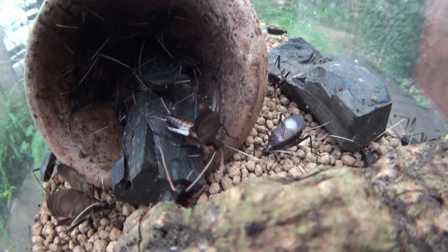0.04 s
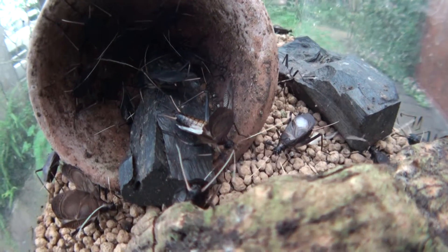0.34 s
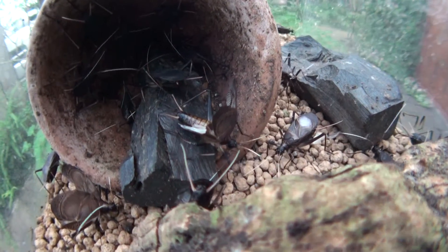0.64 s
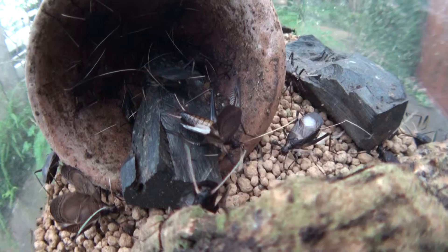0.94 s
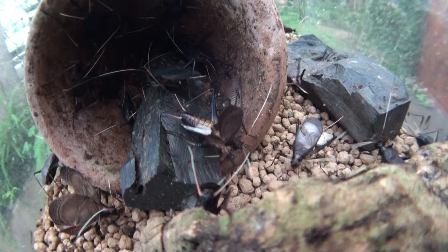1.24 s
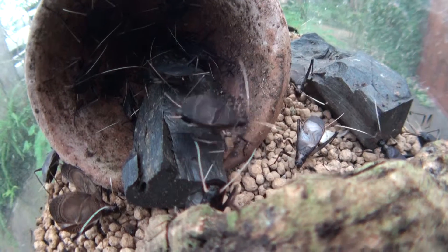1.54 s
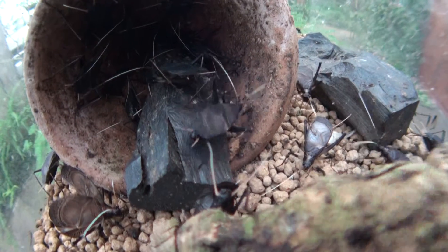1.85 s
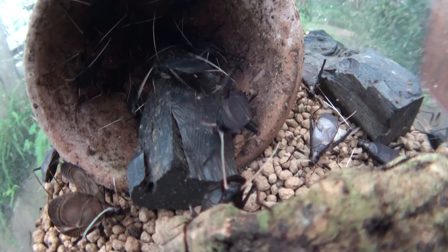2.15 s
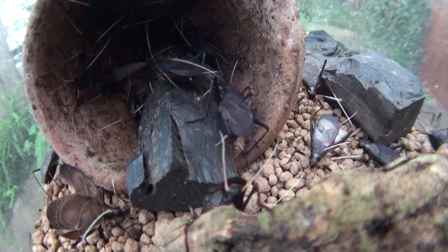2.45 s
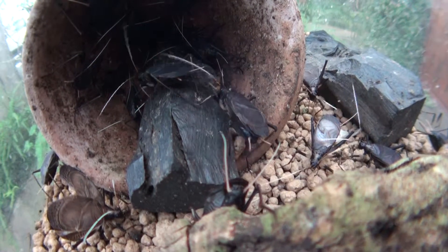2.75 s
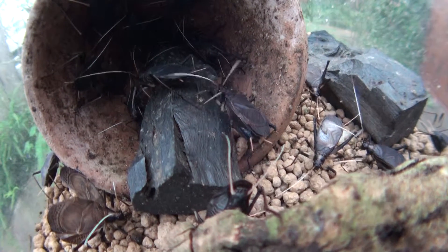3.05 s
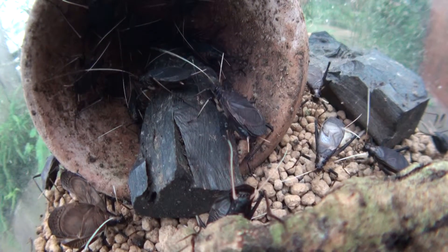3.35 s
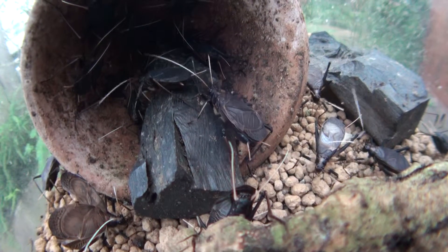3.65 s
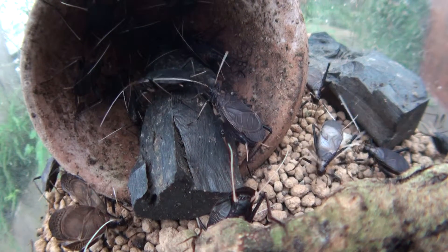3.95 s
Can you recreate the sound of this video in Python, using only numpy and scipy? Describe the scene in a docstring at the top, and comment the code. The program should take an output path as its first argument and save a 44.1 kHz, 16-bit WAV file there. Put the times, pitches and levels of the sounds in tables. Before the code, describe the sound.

A cricket trills loudly up close, then stops, leaving faint high bird chirps.

```python
"""Cricket at a clay pot

A cricket trills close up at the mouth of a clay pot in a terrarium, then stops. Each wing stroke drags
a scraper over a file: one ringing syllable when pressed hard, two short ones when light.
A soft bump and a brushing sound follow, with faint high bird chirps over quiet room tone."""
import sys
import numpy as np
from scipy import signal
from scipy.fft import rfft, irfft
from scipy.io import wavfile
from scipy.ndimage import uniform_filter1d

SR = 44100
rng = np.random.default_rng(int(sys.argv[2]) if len(sys.argv) > 2 else 0)


def dump_mix(stems):
    """Bounce the given channels to the path in sys.argv[1] as a 16-bit WAV at rate SR."""
    frames = np.atleast_2d(stems).T  # one column per channel
    limited = np.clip(frames, -1, 1)  # hard clip at full scale
    pcm = np.round(limited * 32767).astype(np.int16)
    wavfile.write(sys.argv[1], SR, pcm)


N = 176400
T = np.arange(N) / SR
FREQS = np.maximum(np.fft.rfftfreq(N, 1 / SR), 1)
SIDE = np.array([[1], [-1]])  # left plus, right minus

# room tone colour (frequency [Hz], relative level [dB])
ROOM_COLOUR = [(15, -39), (25, -2.5), (79, -2), (169, -1), (227, -1), (469, -8), (804, -4.5), (1170, -9.5),
               (1270, -10.5), (1380, -12), (2300, -16.5), (2770, -19), (5730, -24.5), (6210, -26),
               (6730, -19), (7300, -25.5), (8810, -27), (11800, -30.5), (15500, -26)]
# room tone fader (time [s], level [dB])
ROOM_LEVEL = [(0, -62), (.8, -59.5), (1.3, -59.5), (1.8, -58), (2.1, -59), (2.8, -59), (3.25, -59),
              (3.7, -60), (3.85, -59), (4, -59)]
# room tone stereo width (frequency [Hz], side minus mid [dB])
ROOM_WIDTH = [(40, -29.5), (150, -21.5), (350, -7.5), (700, -6), (1500, -1), (5000, -0.5), (10000, -1),
              (13000, -20)]
# faint whistling bands in the hiss (centre [Hz], width [Hz], level [dB])
WHISTLE_BANDS = [(10080, 400, -84.5), (12100, 1500, -78.5)]
# small rustles (time [s], half-width [s], centre [Hz], bandwidth [Hz], level [dB])
RUSTLE_CUES = [(2.72, .018, 13300, 4000, -68), (3.247, .008, 3000, 6000, -69.5),
               (3.855, 0.024, 1790, 2510, -68), (3.972, 0.016, 2500, 5000, -66.5)]
# distant thin calls (time [s], level [dB])
FAR_CALLS = [(1.97, -76), (2.18, -76), (2.71, -77), (2.92, -77), (3.06, -83), (3.16, -79), (3.84, -78.5)]
# bird chirps (time [s], pitch [Hz], level [dB])
BIRD_CHIRPS = [(1.881, 6690, -73), (1.92, 6570, -63.5), (1.94, 6630, -61), (2.172, 6700, -68),
               (2.21, 6640, -63), (2.254, 6690, -60), (2.466, 6680, -65.5), (2.5, 6650, -63.5),
               (2.57, 6700, -61), (2.76, 6630, -65.5), (2.797, 6600, -62), (2.817, 6950, -67),
               (2.886, 6670, -62.5), (3.083, 6900, -65.5), (3.1, 6660, -63.5), (3.208, 6700, -64),
               (3.36, 6970, -65.5), (3.37, 6640, -65.5), (3.404, 6620, -66), (3.54, 6580, -64),
               (3.64, 6940, -63.5), (3.706, 6690, -66), (3.8, 6580, -69.5), (3.93, 6820, -67.5)]
# brushing fader (time [s], level [dB])
BRUSH_LEVEL = [(2.26, -82), (2.34, -58), (2.41, -58), (2.47, -62.5), (2.58, -66.5), (2.7, -83)]
# brushing colour (frequency [Hz], relative level [dB])
BRUSH_EQ = [(300, -18), (700, -1), (1000, 7.5), (1400, -9), (2200, -9), (3600, -17), (8000, -32)]
# contacts within the bump (time [s], level [dB])
BUMP_HITS = [(1.912, -50), (1.921, -47.5), (1.93, -48), (1.9337, -46.5)]
# bump colour (frequency [Hz], relative level [dB])
BUMP_EQ = [(60, -6), (120, -9), (260, 5), (580, 3), (800, -6), (1500, -20), (4000, -22.5), (9000, -35)]
# low thuds (time [s], pitch [Hz], level [dB])
THUD_HITS = [(0.397, 156, -54.5), (1.029, 111, -58.5), (1.937, 92, -50)]
# wing beat (time [s], rate [strokes/s])
WING_BEAT = [(0.0, 46.91), (0.13, 47.86), (0.23, 54.01), (0.5, 54.6), (0.79, 54.23), (0.87, 49.89),
             (1.02, 43.67), (1.19, 52.08), (1.4, 53.93), (1.55, 55.06), (1.63, 52.91), (1.79, 51.21)]
# trill dynamics (time [s], level [dB])
TRILL_LEVEL = [(0, -22), (.14, -22.5), (.22, -22), (.3, -20), (.38, -19.5), (.45, -21), (.57, -21.5),
               (.66, -23.5), (.8, -23.5), (.9, -23.5), (.97, -18.5), (1.06, -18.5), (1.09, -19),
               (1.13, -13.5), (1.21, -11.5), (1.32, -14), (1.4, -18), (1.5, -19.5), (1.79, -20.5)]
# wing pressure (time [s], pressure [0 = two short syllables, 1 = one long one])
WING_PRESSURE = [(.13, 0.24), (.16, 0.76), (.23, 1), (.36, 0.94), (.42, 0.92), (.46, 0.21), (.56, 0.48),
                 (.59, 0.19), (.9, 0), (.94, 0.08), (1.03, 0.25), (1.06, .1), (1.11, 0.78), (1.33, 0.85),
                 (1.47, .7), (1.5, 0.39)]
# shape of a light stroke (phase [0-1], amplitude [0-1], tooth rate [Hz])
LIGHT_STROKE = [(0, 0, 5100), (.045, .72, 4930), (.12, 1, 4835), (.24, .55, 4740), (.35, 0, 4640),
                (.47, 0, 5080), (.53, .75, 4930), (.59, .92, 4835), (.66, .55, 4750), (.73, 0, 4660)]
# shape of a pressed stroke (phase [0-1], amplitude [0-1], tooth rate [Hz])
PRESSED_STROKE = [(0, 0, 5000), (.07, .72, 4890), (.17, 1, 4820), (.32, .72, 4780), (.46, .85, 4905),
                  (.57, .92, 4890), (.69, .66, 4790), (.79, 0, 4720)]
# spells when the scraper misses the first half of the stroke (start [s], end [s])
EARLY_MISSES = [(.811, .85)]
# spells when it misses the second half (start [s], end [s])
LATE_MISSES = [(.572, .646), (.682, .72), (.757, .776), (1.506, 1.578), (1.598, 1.673), (1.711, 1.729)]
# tooth rate drift, sharpest near the top of the swell (time [s], offset [Hz])
TOOTH_DRIFT = [(0, 11), (.3, 6.5), (1.0, 2.5), (1.14, 32.5), (1.18, 76.5), (1.22, 30), (1.3, 4),
               (1.4, -19.5), (1.55, 7)]
# wing resonances rung by the rasp (centre [Hz], width [Hz], relative level [dB])
WING_MODES = [(4600, 300, -26), (5390, 490, -31.5), (6343, 440, -39), (8935, 800, -39.5), (9965, 530, -38),
              (12320, 739, -39.5), (13150, 1000, -43.5), (14280, 250, -47.5), (15050, 560, -47)]


def amp(db):
    """Decibels to gain."""
    return 10 ** (np.asarray(db) / 20)


def curve(rows, at=T, column=1):
    """Straight lines through a column of a table."""
    rows = np.array(rows, float)
    return np.interp(at, rows[:, 0], rows[:, column])


def colour(rows):
    """EQ curve through (frequency [Hz], level [dB]) points."""
    rows = np.array(rows, float)
    return amp(np.interp(np.log(FREQS), np.log(rows[:, 0]), rows[:, 1]))


def resonance(hz, width_hz):
    """Steep-sided response of a resonance."""
    return 1 / (1 + 1j * (FREQS / hz - hz / FREQS) * hz / width_hz / np.sqrt(2)) ** 2


def through(x, gain):
    """Filter a sound by a frequency response."""
    return irfft(rfft(x) * gain, N)


def noise(gain):
    """Noise of rms 1 with the given spectrum."""
    x = through(rng.standard_normal(N), gain)
    return x / x.std()


def wobble(hz):
    """Random wavering up to a given rate."""
    return noise(1 / (1 + (FREQS / hz) ** 4))


def swell(at, half_width_s):
    """A bell-shaped rise and fall around a moment."""
    return np.exp(-.5 * ((T - at) / half_width_s) ** 2)


def within(spans):
    """A gate, open during the listed spells."""
    return np.any([(T > a) & (T < b) for a, b in spans], axis=0)


def echoes(x, t60_s):
    """Dense reflections that die away."""
    t = T[:SR // 2]
    tail = rng.standard_normal(len(t)) * np.exp(-np.log(1000) * t / t60_s) * (t > .001)
    return signal.fftconvolve(x, tail / np.linalg.norm(tail))[:N]


def room_tone():
    """A quiet bed of air, wider in the treble, with a thin hiss and a low drone."""
    mid = noise(colour(ROOM_COLOUR))
    side = through(noise(colour(ROOM_COLOUR)), colour(ROOM_WIDTH))
    hiss = sum(amp(db) * noise(resonance(hz, width)) for hz, width, db in WHISTLE_BANDS)
    drone = amp(-71) * noise(resonance(hz=218, width_hz=25))
    return amp(curve(ROOM_LEVEL)) * (mid + side * SIDE) + hiss + drone


def rustles():
    """Brief, faint puffs of band noise."""
    return sum(amp(db) * swell(at, half_width) * noise(resonance(hz, band))
               for at, half_width, hz, band, db in RUSTLE_CUES)


def birds(fall_hz_per_s=7500):
    """Thin falling chirps with a short reverb, and fainter, lower calls from far off."""
    chirps = 0
    for at, hz, db in BIRD_CHIRPS:
        t = T - at
        sweep = np.sin(2 * np.pi * (hz - fall_hz_per_s * t / 2) * t)
        chirps += amp(db) * swell(at, half_width_s=.0095) * sweep
    call_level = sum(amp(db) * swell(at, half_width_s=.04) for at, db in FAR_CALLS)
    calls = call_level * noise(resonance(hz=5090, width_hz=220))
    reverb = amp(-11) * np.array([echoes(chirps, t60_s=.24) for _ in range(2)])
    return chirps + calls + reverb


def brush(stereo_width=.38):
    """A soft brushing sound that swells and fades."""
    level = amp(curve(BRUSH_LEVEL)) * within([(BRUSH_LEVEL[0][0], BRUSH_LEVEL[-1][0])])
    mid, side = (noise(colour(BRUSH_EQ)) for _ in range(2))
    return level * (mid + stereo_width * side * SIDE)


def bumps(hit_decay_s=.0063, thud_decay_s=.025):
    """A cluster of dull contacts; low thuds land there and twice under the trill."""
    hits = sum(amp(db) * (T > at) * np.exp(-np.abs(T - at) / hit_decay_s) for at, db in BUMP_HITS)
    out = hits * noise(colour(BUMP_EQ))
    for at, hz, db in THUD_HITS:
        t = np.maximum(T - at, 0)
        out += amp(db) * np.exp(-t / thud_decay_s) * np.sin(2 * np.pi * hz * t)
    return out


def pot_and_room(song):
    """Tight reflections inside the clay pot and a faint tail from the room."""
    pot_mid = amp(-23) * echoes(song, t60_s=.07)
    pot_side = amp(-22) * echoes(song, t60_s=.035)
    room = amp(-43) * np.array([echoes(song, t60_s=.16) for _ in range(2)])
    return pot_mid + pot_side * SIDE + room


def file_rasp(scrape):
    """The rasp of the file rings the wing's resonances, each as a band of noise."""
    rasp = 0
    for hz, width, db in WING_MODES:
        band = through(scrape * rng.standard_normal(N), resonance(hz, width))
        rasp += amp(db) * np.sqrt(SR / 2 / width) * band
    return rasp


def wing_ring(tone, swing, pressure):
    """An upper wing mode follows the tone and rings on as the scraper lets go."""
    fall_rate = np.maximum(-np.gradient(swing) * SR, 0)
    release = fall_rate * (1 - pressure) * rng.standard_normal(N)
    return through(amp(-.5) * tone + amp(-53.5) * release, resonance(hz=5555, width_hz=300))


def wing_tone(swing, tooth_hz, stroke, pressure, level_db):
    """File teeth drive the wing near its resonance: a fluttering tone with two overtones."""
    jitter_hz, main_hz, light_glide = 24, 4830, .64
    pitch_hz = tooth_hz + curve(TOOTH_DRIFT) + jitter_hz * wobble(hz=630)
    teeth = 2 * np.pi * (np.cumsum(pitch_hz) / SR + rng.random(N)[stroke])  # fresh phase each stroke
    # light strokes glide further in the second harmonic
    glide = 2 * np.pi * np.cumsum(light_glide * (1 - pressure) * (tooth_hz - main_hz)) / SR
    second = amp(-17) * np.sin(2 * (teeth + glide))
    third = amp(-46 + .7 * (level_db + 21)) * np.sin(3 * teeth)  # brighter when louder
    flutter = 1 + .04 * wobble(hz=300)
    return swing * flutter * (np.sin(teeth) + second + third)


def cricket():
    """Stroke by stroke, the scraper crosses the file and sets the wing singing and rasping."""
    start_phase, half_stroke = .03, .42
    scatter_db, light_scatter_db = .5, .8
    rasp_db, light_rasp_db, grain_db, rasp_growth = -11.5, 3.5, 3.5, .43
    turn_floor, slide_share = .05, .31

    beats = np.cumsum(curve(WING_BEAT)) / SR + start_phase
    stroke, phase = beats.astype(int), beats % 1
    late = phase > half_stroke
    pressure = curve(WING_PRESSURE)
    contact, tooth_hz = ((1 - pressure) * curve(LIGHT_STROKE, phase, column)
                         + pressure * curve(PRESSED_STROKE, phase, column) for column in (1, 2))
    catches = ~np.where(late, within(LATE_MISSES), within(EARLY_MISSES))

    # each half stroke has its own strength; light ones vary more
    accent = rng.standard_normal(N)[2 * stroke + late]
    level_db = curve(TRILL_LEVEL) + accent * (scatter_db + light_scatter_db * (1 - pressure))
    force = amp(level_db) * (T < WING_BEAT[-1][0])
    swing = uniform_filter1d(force * contact * catches, size=30)
    tone = wing_tone(swing, tooth_hz, stroke, pressure, level_db)
    ring = wing_ring(tone, swing, pressure)

    # the scraper still slides and hisses where it turns or misses the second half
    scrape = (force * np.maximum(contact, turn_floor)) ** rasp_growth
    scrape *= np.where(catches, 1, slide_share * late)
    scrape *= amp(rasp_db + light_rasp_db * (.5 - pressure) + grain_db * wobble(hz=500.4))
    rasp = file_rasp(scrape)
    dull_scuff = amp(-48.5) * scrape * noise(resonance(hz=3500, width_hz=1500))

    # the wing radiates little below its main resonance
    low_cut = signal.butter(12, 4406, "high", fs=SR, output="sos")
    return signal.sosfilt(low_cut, tone + ring + rasp) + dull_scuff


def scene(balance_db=.6):
    """The cricket and its reflections over the background, all panned a touch left."""
    song = cricket()
    mix = song + pot_and_room(song) + birds() + bumps() + brush() + rustles() + room_tone()
    return mix * amp(SIDE * balance_db / 2)


def record(dry, top_hz=15800):
    """A steep high cut on the whole mix."""
    return signal.sosfilt(signal.ellip(10, .2, 80, top_hz, fs=SR, output="sos"), dry)


dry = scene()
out = record(dry)
dump_mix(out)
```